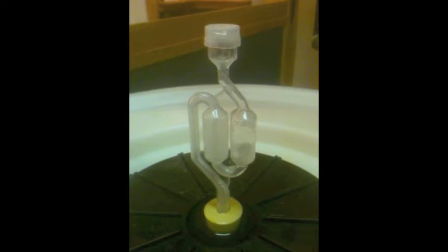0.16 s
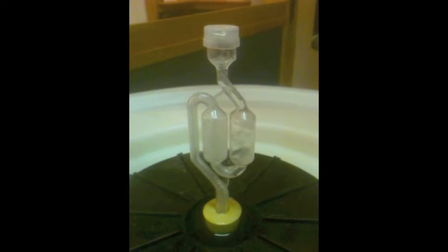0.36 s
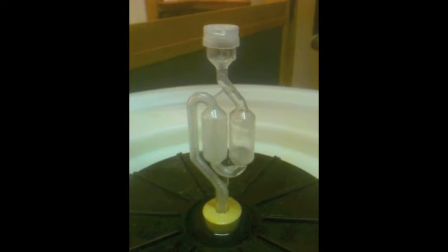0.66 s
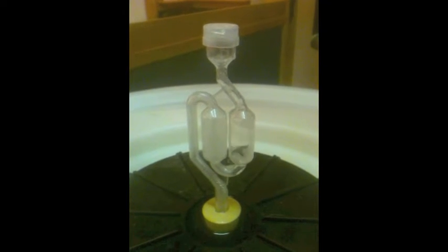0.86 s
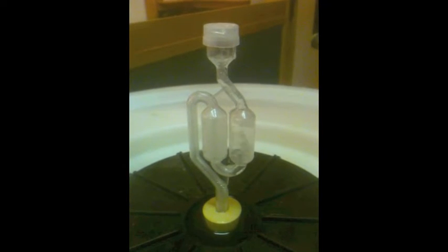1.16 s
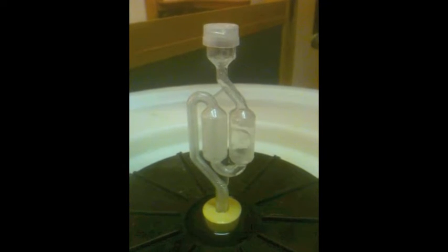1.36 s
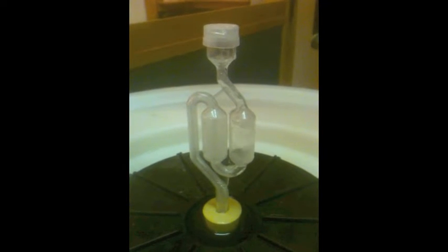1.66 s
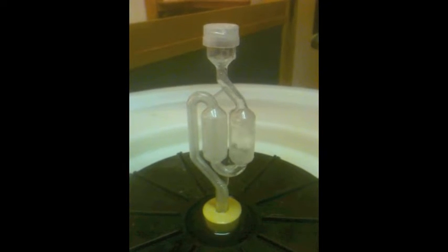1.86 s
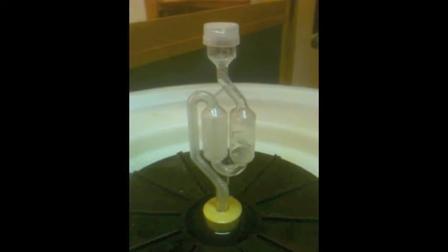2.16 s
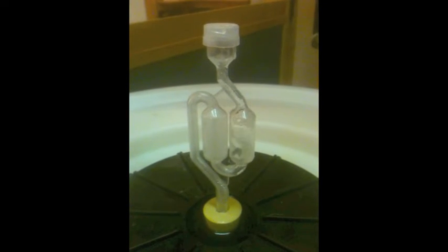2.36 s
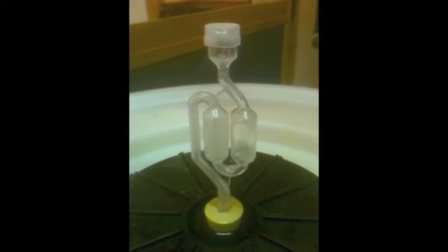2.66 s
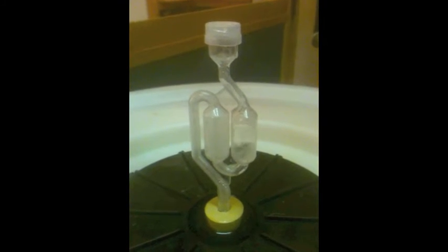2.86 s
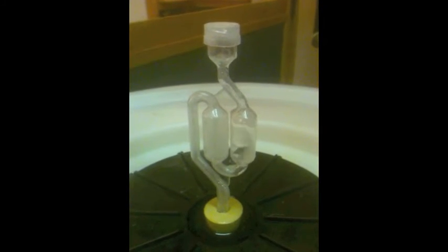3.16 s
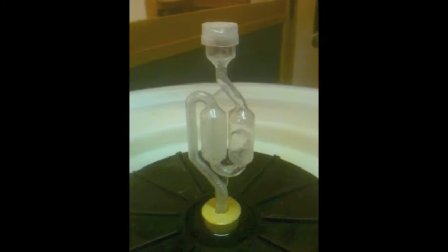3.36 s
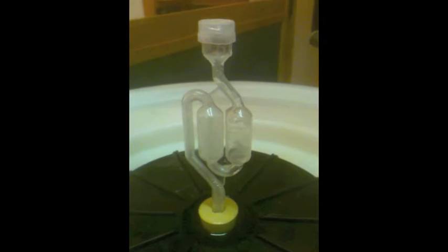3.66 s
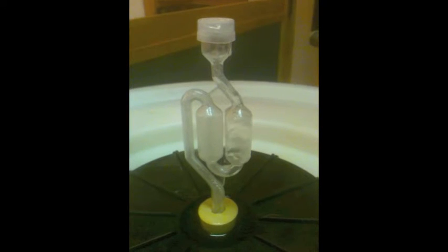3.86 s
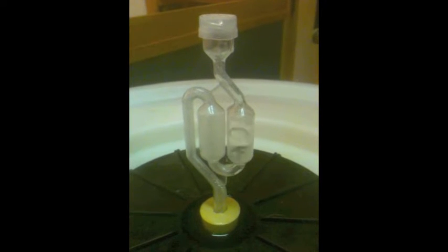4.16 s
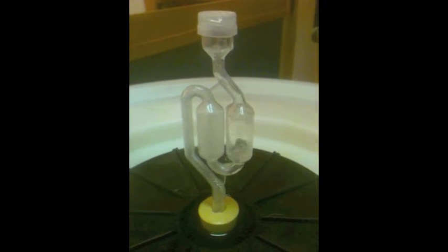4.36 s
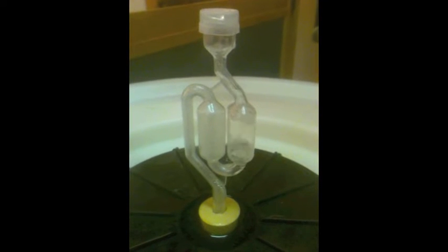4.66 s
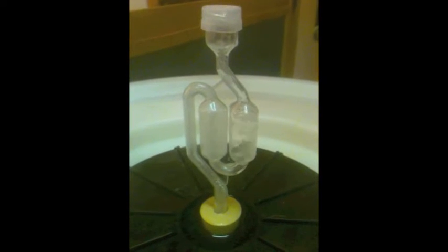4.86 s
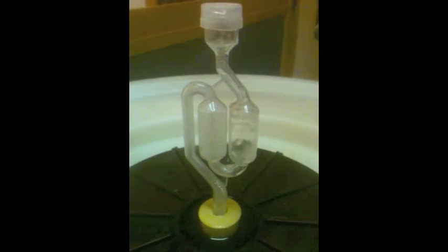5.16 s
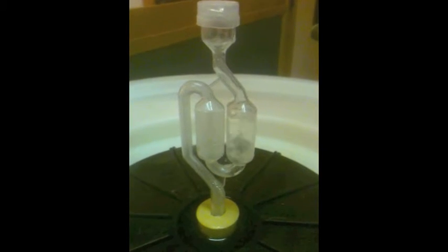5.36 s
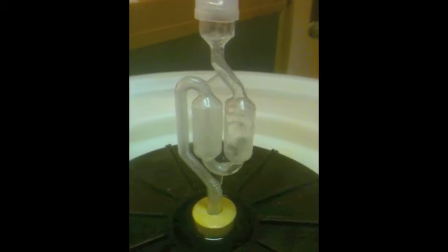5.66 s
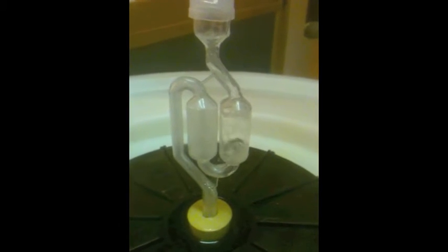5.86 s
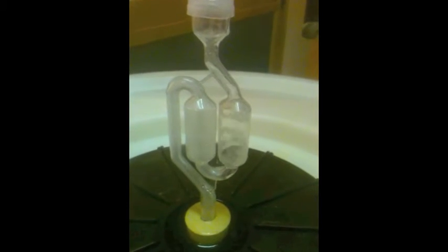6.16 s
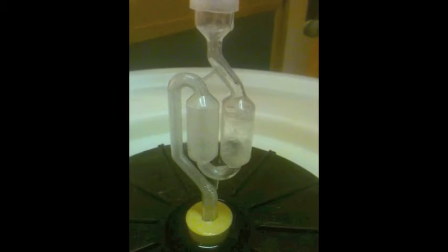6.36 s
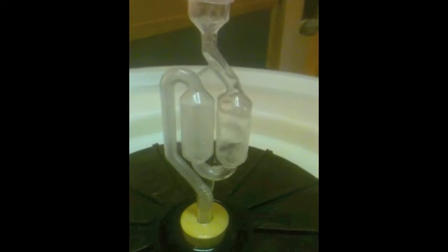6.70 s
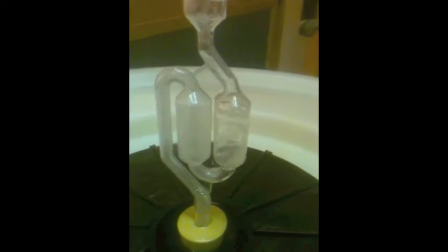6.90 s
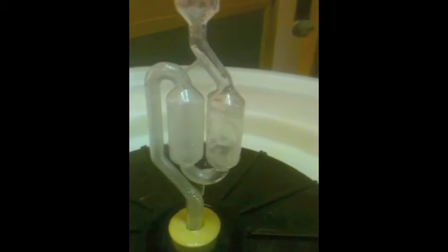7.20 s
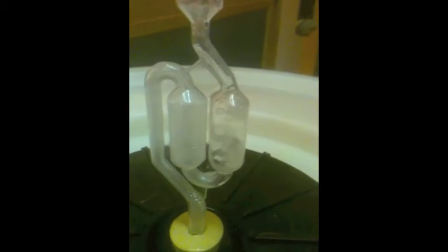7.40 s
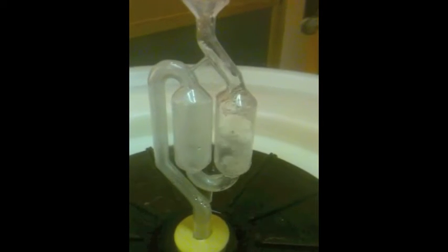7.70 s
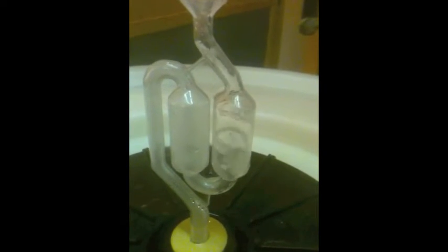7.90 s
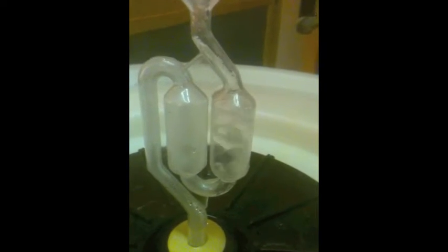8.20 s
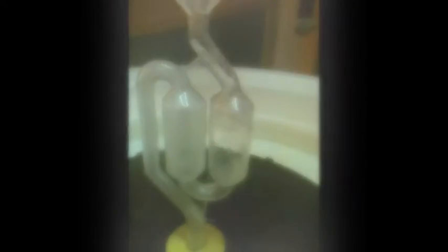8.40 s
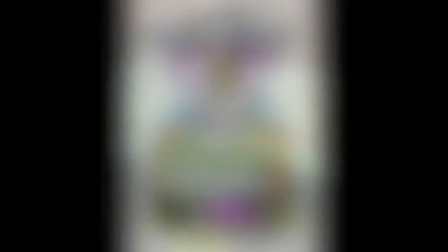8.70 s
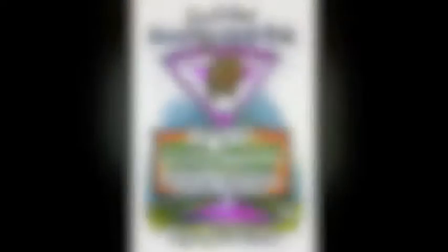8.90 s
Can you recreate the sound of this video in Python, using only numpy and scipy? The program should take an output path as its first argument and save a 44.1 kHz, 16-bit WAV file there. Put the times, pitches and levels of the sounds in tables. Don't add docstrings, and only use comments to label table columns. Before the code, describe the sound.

Rapid hollow glugs bubble nonstop through a small plastic airlock, each rising in pitch, with bright pops, ticks and wet snaps, fading out at the end.

```python
import sys
import numpy as np
from scipy import signal
from scipy.fft import rfft, irfft, next_fast_len
from scipy.io import wavfile
from scipy.ndimage import uniform_filter1d

SR = 44100
rng = np.random.default_rng(int(sys.argv[2]) if len(sys.argv) > 2 else 0)


def gain_from_db(level_db):
    decades = np.asarray(level_db, float) / 20
    return 10 ** decades


def inscribe(sig):
    pcm = np.round(np.clip(np.atleast_2d(sig).T, -1, 1) * 32767)
    wavfile.write(sys.argv[1], SR, pcm.astype(np.int16))


N = 398663

# [t/s, level/dB]
FADE = [
    (5.2, -8.5),
    (6.25, -9.5),
    (6.75, -10),
    (7.25, -16),
    (7.75, -19),
    (8.05, -29.5),
    (8.178, -43.5),
    (8.19, -105),
]
# [t/s, start f/Hz, rise/octaves over the life, level/dB]
DEEP_GLUGS = [(4.54, 256.4, 1.6, -27), (.165, 316, 0.52, -20), (.236, 445, 1.06, -22.5),
              (.629, 330, 1.68, -19.5), (.709, 272.5, 1.7, -24.5), (.776, 337, 0.25, -24),
              (1.158, 316.3, 0.79, -25), (1.609, 326.5, 1.21, -24.5), (1.69, 313.6, 0.42, -25),
              (1.956, 305.4, 0.43, -24), (2.006, 321.5, 2.1, -21.5), (2.601, 269, 1.26, -24),
              (7.815, 306.5, 0.65, -30), (8.088, 290, 1.2, -27), (2.803, 362, 0.49, -22.5),
              (2.919, 304, 0.7, -27), (3.435, 286.2, 1.92, -17), (3.864, 295.5, 0.95, -17.5),
              (4.053, 305.6, 2.45, -16.5), (4.074, 796, 0.48, -44), (4.453, 378, 2.16, -25),
              (4.644, 329, 1.02, -21), (5.03, 312, 0.55, -21.5), (5.426, 383.6, 1.3, -24.5),
              (6.073, 336, 0.51, -28.5), (6.498, 318.5, 1.16, -27.5), (.066, 294, 1.14, -25),
              (7.852, 351, 2.05, -30)]
# [t/s, start f/Hz, rise/octaves, level/dB]
LOW_GLUGS = [(1.352, 381, 1.03, -24), (6.01, 334, 0.75, -38), (.115, 274.6, 1.28, -24.5),
             (.443, 334, 1.05, -21.5), (.525, 310, 0.77, -24), (1.002, 334, 0.28, -24.5),
             (1.031, 313.6, 0.95, -19), (1.115, 290, 0.77, -17.5), (1.316, 317, 1.64, -17.5),
             (1.486, 303, 0.84, -17), (1.746, 318, 1.48, -16), (1.821, 293.4, 1.55, -17),
             (2.095, 338, 0.079, -22.5), (2.161, 293, 1.52, -17.5), (2.231, 315, 0.84, -19),
             (2.381, 316, 1.3, -17), (3.232, 308, 0.79, -16), (3.784, 377, 0.76, -16.5),
             (4.224, 387.5, 0.77, -17.5), (4.345, 352.5, 1.04, -18.5), (4.756, 279, 0.65, -17),
             (4.952, 415, 1.13, -21), (4.986, 380, 0.036, -21), (5.067, 263, 1.56, -14.5),
             (5.172, 311, 0.54, -21), (6.094, 318.4, 0.96, -19.5), (6.19, 365.4, 0.85, -23.5),
             (2.745, 325, 0.46, -28.5), (7.74, 398, 0.76, -29), (7.491, 308, 0.45, -26),
             (7.567, 364, 1.1, -22), (3.726, 257, 1.63, -22), (3.694, 318, .1, -35),
             (6.61, 370, 0.52, -30.5), (6.69, 338, 0.6, -31), (6.735, 328, 0.47, -35),
             (6.241, 337, 0.37, -32.5), (7.0, 327, 0.3, -32), (1.215, 352, 1.16, -24)]
# [t/s, start f/Hz, rise/octaves, level/dB]
MID_GLUGS = [(4.398, 317, 0.59, -24.5), (4.59, 335, .4, -25), (0.335, 306, 0.37, -21),
             (0.383, 431, 0.48, -21), (.483, 287, 0.64, -19.5), (.92, 341, 0.72, -20.5),
             (1.401, 309, 0.94, -16), (2.44, 311, 0.39, -19.5), (2.501, 445, 1.05, -14.5),
             (2.963, 384, 1.2, -14.5), (3.024, 314, 0.38, -19.5), (3.131, 338, 0.68, -23),
             (3.472, 313.5, 1.34, -16), (3.987, 349, 1.12, -20.5), (4.137, 391, 1.03, -19.5),
             (4.484, 390.5, 2.3, -23.5), (4.672, 478, 2, -19.5), (4.893, 283, 0.41, -21),
             (5.229, 418, 0.25, -15), (5.349, 284, 0.77, -20), (5.494, 372, 1.08, -21),
             (5.567, 329, 0.086, -15), (5.655, 277, 0.83, -21.5), (5.997, 391, 1.02, -23),
             (6.364, 289, 0.85, -23.5), (6.528, 374, 0.45, -20.5), (6.776, 313, 0.6, -23),
             (8.005, 384, 1.4, -19.5), (7.394, 342, 0.97, -23.5), (7.57, 807, 0.67, -24),
             (7.681, 314, 0.68, -25.5), (2.655, 328, 0.71, -23)]
# [t/s, start f/Hz, rise/octaves, level/dB]
HIGH_GLUGS = [(.77, 431, 0.71, -21.5), (1.874, 504, 1.1, -19), (1.924, 320, 0.19, -26),
              (2.08, 300, 0.55, -22.5), (2.705, 525, 0.5, -11), (2.856, 560, 0.69, -18.5),
              (2.978, 586, 0.16, -25), (3.056, 580, 0.81, -24.5), (3.309, 364, 0.63, -15),
              (3.561, 297, 0.3, -18.5), (3.629, 383, 0.85, -17.5), (4.278, 444, .02, -21),
              (4.505, 720, 0.15, -17), (4.818, 384, 0.83, -15.5), (5.147, 412, 0.031, -12),
              (5.82, 334, 0.19, -25.5), (5.862, 398, 1.17, -23.5), (6.291, 500, 0.47, -25),
              (6.435, 379, 0.55, -24.5), (6.925, 304, 0.2, -21.5), (7.163, 500, 0.89, -15.5),
              (7.268, 433, 0.78, -22), (7.334, 380, 1.3, -24.5), (7.927, 750, .23, -23),
              (7.931, 432, 1.07, -20), (2.575, 346, 0.17, -27), (7.22, 384, 0.078, -21.5)]
# [t/s, start f/Hz, rise/octaves, level/dB]
PLOPS = [(2.485, 595, .3, -37), (0.0, 258, .01, -10), (0.0, 626, 0.48, -7), (.565, 550, 0.54, -10.5),
         (.584, 717, 0.16, -25), (.86, 382, 0.89, -9), (1.189, 790, 0.39, -20.5), (1.553, 337, 0.24, -21),
         (1.576, 545, 0.87, -21), (1.668, 570, 0.43, -18.5), (1.761, 560, 0.49, -12.5),
         (2.308, 810, 0.19, -20.5), (3.232, 857, .01, -24), (3.943, 538, 0.27, -24.5),
         (4.078, 488, 0.87, -15.5), (4.245, 597, 0.084, -18.5), (4.543, 537, 0.41, -13.5),
         (5.736, 308, 0.62, -16), (5.946, 310, 0.18, -21), (6.844, 433, 0.47, -17), (6.923, 790, 0.11, -20),
         (6.998, 510, 0.33, -27.5), (7.144, 415, 0.4, -23), (8.03, 640, 0.5, -18)]
# [t/s, start f/Hz, rise/octaves, level/dB]
BRANCHES = [(2.363, 1190, 0.61, -18), (.868, 1103, 0.18, -19.5), (5.935, 1834, 2.3, -24),
            (1.67, 933, 0.72, -21.5), (2.006, 1386, 0.13, -24.5), (2.585, 750, 0.079, -21.5),
            (2.655, 823, 0.6, -18.5), (2.745, 586, 0.25, -24), (2.92, 697, 0.25, -30),
            (3.031, 796, 0.72, -21), (4.36, 1040, 0.6, -36.5), (4.506, 1158, 0.33, -17),
            (5.129, 1290, 0.77, -30), (5.248, 1057, 0.44, -22.5), (5.295, 696, 0.36, -25.5),
            (5.33, 292, .1, -24), (5.50, 400, 1.1, -26), (5.585, 472, 0.69, -18), (5.44, 1900, 0.155, -31)]
# [t/s, peak level/dB, f/Hz]
DROPS = [(0.08, -24.5, 3500), (0.1258, -30, 2120), (0.2957, -25.5, 1910), (0.3421, -25, 1470),
         (0.4668, -29, 2240), (1.3153, -24.5, 2110), (1.3389, -26, 1980), (1.3495, -25, 2440),
         (1.6834, -21, 2130), (1.7659, -19.5, 2200), (1.915, -25, 2300), (2.0073, -20.5, 1480),
         (2.154, -24, 3160), (2.2343, -36, 3900), (2.5323, -21.5, 3880), (2.5616, -31, 1740),
         (2.792, -21.5, 1370), (2.8612, -34, 3630), (3.182, -19.5, 4000), (3.299, -20.5, 3080),
         (3.551, -24.5, 2420), (3.6948, -23, 4230), (3.749, -25, 1790), (3.9489, -25.5, 2180),
         (4.301, -20.5, 2280), (4.3403, -18, 1410), (4.4643, -21.5, 1870), (4.7153, -22, 2200),
         (4.7917, -27, 1790), (4.817, -25, 1610), (4.9445, -24, 2840), (5.1146, -26.5, 2210),
         (5.1264, -18, 4420), (5.249, -24, 1610), (5.31, -24, 2350), (5.3455, -23.5, 1640),
         (5.4395, -22.5, 1950), (5.6342, -31, 1470), (5.657, -28, 2150), (5.932, -22.5, 1870),
         (6.232, -29, 3580), (6.2962, -24.5, 4200), (6.8568, -31, 2300), (6.868, -21, 3900)]


def in_time(rows):
    return np.interp(np.arange(N) / SR, *np.transpose(rows))


def at_hz(points, hz):
    points = np.array(points)
    return np.interp(np.log(hz), np.log(points[:, 0]), points[:, 1])


def rms_one(x):
    return x / np.sqrt(np.mean(x ** 2))


def lowpass(x, hz):
    return signal.sosfilt(signal.butter(2, hz, fs=SR, output="sos"), x)


def bandpass(x, low_hz, high_hz, order=2):
    return signal.sosfilt(signal.butter(order, [low_hz, high_hz], "band", fs=SR, output="sos"), x)


def add(out, s, sound):
    i = int(s * SR)
    out[i:i + len(sound)] += sound[:N - i]


def before_fade(events):
    return [(s, db - np.interp(s, *np.transpose(FADE)), *rest) for s, db, *rest in events]


def clicks_at(events):
    clicks = np.zeros(N)
    for s, db, *_ in events:
        clicks[int(s * SR)] = gain_from_db(db)
    return clicks


def ring(clicks, hz, t60):
    radius, w = gain_from_db(-60 / (t60 * SR)), 2 * np.pi * hz / SR
    return signal.lfilter([0, np.sin(w)], [1, -2 * radius * np.cos(w), radius ** 2], clicks + 1e-18)


def puff(clicks, noise):
    return signal.lfilter([1], [1, -.94], clicks) * noise


def bubble(hz, rise, db, life_ms, shape, sign, overtone=0, swell=.55):
    t = np.arange(int(life_ms * SR / 1000 * 7 ** (1 / shape)) + 9) / SR
    age = 1000 * t / life_ms
    pitch = np.minimum(hz * 2 ** np.minimum(rise * age ** 1.2, 3), .45 * SR)
    attack = 1 - np.exp(-t * hz / swell)
    decay = np.exp(-age ** shape)
    phase = 2 * np.pi * np.cumsum(pitch) / SR
    return sign * gain_from_db(db) * attack * decay * (np.sin(phase) + overtone * np.sin(2 * phase))


def room():
    # [f/Hz, level/dB per Hz]
    hiss_curve = [
        (100, -46),
        (200, -16),
        (350, -8),
        (810, -11),
        (1300, -19),
        (4400, -15.5),
        (5400, -29),
        (13500, -29),
        (16000, -34),
    ]
    hz = np.fft.rfftfreq(N, 1 / SR) + 1
    white = rng.standard_normal((3, N))
    hiss = rms_one(irfft(rfft(white[0]) * gain_from_db(at_hz(hiss_curve, hz)), N))
    hum = rms_one(ring(white[1], hz=60, t60=0.6))
    whine = rms_one(ring(white[2], hz=12960, t60=.8))
    return gain_from_db(-25 - 15.5) * hiss + gain_from_db(-52) * hum + gain_from_db(-67) * whine


def hand():
    # [t/s, level/dB]
    rumble = [
        (0, -18),
        (.15, -32),
        (3.5, -34),
        (3.8, -30.5),
        (4.5, -34),
        (4.7, -28),
        (5.6, -25.5),
        (5.9, -37),
    ]
    # [t/s, peak level/dB]
    shifts = [
        (4.688, -20.5),
        (4.981, -22),
        (5.067, -23),
        (5.388, -30.5),
        (5.64, -23.5),
        (6.273, -30),
        (7.382, -35.5),
        (7.647, -39),
        (7.92, -40.5),
    ]
    deep = bandpass(rng.standard_normal(N), 8, 66, order=3)
    bumps = clicks_at(before_fade(shifts))
    thuds = ring(bumps, 107, 0.044) + 1.3 * ring(bumps, 227, 0.041)
    return gain_from_db(in_time(rumble)) * rms_one(deep) + lowpass(thuds, 400)


def glugs():
    tone, knock = np.zeros(N), np.zeros(N)
    faint = rng.uniform([0, 280, .3, -40, 15], [8.2, 620, 1.1, -32, 50], (210, 5))
    kinds = [(DEEP_GLUGS, 94), (LOW_GLUGS, 50), (MID_GLUGS, 43), (HIGH_GLUGS, 26), (PLOPS, 18)]
    rows = [(*row, life_ms) for table, life_ms in kinds for row in table] + faint.tolist()
    draws = rng.uniform(-1.2, 1, (len(rows), 2))
    for (s, hz, rise, db, life_ms), (push, squeeze) in zip(rows, draws):
        sign = np.sign(push)
        add(tone, s, bubble(hz, rise, db, life_ms, 3, sign, overtone=.16 * squeeze))
        knock[int(s * SR)] += gain_from_db(db + 10.0) * push
    slosh = rms_one(lowpass(rng.standard_normal(N), 90))
    return tone * gain_from_db(3.2 * slosh), knock


def through_neck(tone, knock):
    tone, knock = bandpass([tone, knock], 150, 1100, order=3)
    at_neck = signal.lfilter(*signal.iirpeak(560, 2, fs=SR), tone)
    return tone + (gain_from_db(4) - 1) * at_neck, knock


def chamber(blows):
    # [f/Hz, level/dB, t60/s]
    modes = [
        (245, -13, .04),
        (350, -14, .09),
        (820, -4.5, .07),
        (1165, -10, .025),
    ]
    return sum(gain_from_db(db) * ring(blows, hz, t60) for hz, db, t60 in modes)


def walls(x, level_db):
    out = np.zeros(N)
    lags = (np.cumsum(rng.uniform(0.0028, 0.013, size=14)) * SR).astype(int)
    for k, lag in enumerate(lags):
        out[lag:] += (-1) ** k * gain_from_db(level_db - 420 * lag / SR) * x[:-lag]
    return lowpass(out, 2500)


def churn(big):
    loudness = np.abs(signal.hilbert(big, next_fast_len(N))[:N])
    return gain_from_db(-18.0) * loudness * bandpass(rng.standard_normal(N), 700, 3000)


def spray(count, spread_db, cycles):
    # [f/Hz, level/dB]
    colour = [
        (700, -55.5),
        (1200, -24),
        (4200, -24),
        (6300, -32.5),
        (8600, -24),
        (14000, -60.5),
    ]
    out = np.zeros(N)
    swarms = np.repeat(rng.random((count // 3, 2)), 3, axis=0)
    big_ones = DEEP_GLUGS + LOW_GLUGS + MID_GLUGS + HIGH_GLUGS + PLOPS + BRANCHES
    born = np.array([row[0] for row in big_ones])
    wake = rng.choice(born, count // 3) + rng.exponential(.055, count // 3)
    swarms[:, 0] = np.repeat(np.minimum(wake, 8.2), 3)
    for (when, size), draw in zip(swarms, rng.standard_normal((count, 5))):
        hz = min(700 * 20 ** size * 2 ** (.6 * draw[0]), 15500)
        life_ms = 1000 * cycles * 2 ** (.45 * draw[1]) / hz
        db = at_hz(colour, hz) + spread_db * draw[2]
        drop = bubble(hz, .01 * abs(draw[4]), db, life_ms, 1, np.sign(draw[4]), swell=1.2)
        add(out, abs(when + .0025 * draw[3]), drop)
    return out


def pops(rows, cycles, swell, boost_db):
    tone = np.zeros(N)
    for (s, hz, db), sign in zip(rows, rng.choice([-1, 1], len(rows))):
        life_ms = 1000 * cycles / hz
        add(tone, s, bubble(hz, .025, db + boost_db, life_ms, 1.2, sign, swell=swell))
    return tone


def small_bubbles():
    # [t/s, f/Hz, level/dB]
    pings = [(.01, 3560, -14), (0.182, 4260, -25.5), (.554, 4040, -16), (.648, 4240, -21.5),
             (1.685, 4630, -24), (2.251, 4040, -21), (2.611, 3867, -23.5), (2.631, 4180, -21.5),
             (2.882, 3510, -20), (3.09, 4230, -20), (3.984, 3760, -8.5), (3.988, 4300, -23),
             (4.963, 2910, -18.5), (5.567, 4540, -23.5), (5.58, 4230, -19.5), (6.133, 4480, -25),
             (6.192, 4000, -27), (6.37, 3830, -25.5), (6.605, 4100, -21)]
    # [t/s, f/Hz, level/dB]
    pockets = [(3.632, 1240, -21), (2.925, 1290, -22), (3.172, 1140, -23), (.57, 1207, -10.5),
               (1.525, 2400, -17), (1.542, 1150, -11.5), (1.765, 1050, -14), (2.366, 2480, -7.5),
               (3.392, 1270, -9.5), (3.478, 1670, -13), (3.765, 2100, -15), (4.117, 1216, -7),
               (4.25, 1240, -13.5), (4.264, 2450, -15.5), (4.268, 1320, -19), (4.403, 1202, -6.5),
               (4.525, 1175, -14), (6.453, 1280, -19.5), (6.881, 2270, -13.5), (6.901, 2440, -14),
               (7.125, 2300, -18.5), (7.158, 1420, -10), (7.589, 2250, -8), (7.879, 1500, -20),
               (8.022, 2520, -13.5)]
    # [t/s, f/Hz, level/dB]
    films = [(0.413, 4760, -20.5), (1.035, 1180, -16), (1.197, 1250, -17.5), (1.578, 1170, -13),
             (1.96, 2670, -18), (2.172, 3530, -13.5), (2.309, 1140, -11.5), (2.881, 2240, -15),
             (3.213, 2540, -19), (3.315, 2220, -18), (3.315, 4270, -10), (3.322, 1280, -13.5),
             (3.712, 5600, -17), (4.178, 2070, -16), (4.283, 3560, -17), (4.499, 1500, -15.5),
             (4.665, 1120, -19.5), (4.689, 1185, -14), (4.988, 3000, -20), (5.201, 1600, -16),
             (5.498, 3480, -12), (5.767, 1200, -18.5), (6.147, 4170, -16.5), (6.148, 2270, -18),
             (6.48, 4300, -17.5), (6.643, 4320, -21), (6.881, 4500, -11.5), (7.091, 3380, -20),
             (7.093, 1690, -20)]
    droplets = [(s, hz, db) for s, db, hz in before_fade(DROPS)]
    out = pops(pings, cycles=11.0, swell=0.5, boost_db=12.0)
    out += pops(pockets, cycles=7.1, swell=1.1, boost_db=6.5)
    out += pops(films, cycles=4.6, swell=0.066, boost_db=7.0)
    out += pops(droplets, cycles=6.3, swell=0.17, boost_db=0.0)
    return out


def snaps():
    # [t/s, peak level/dB]
    middling = [(0.175, -25), (0.2883, -22), (0.3514, -22), (0.408, -24), (0.7751, -34), (1.004, -36),
                (1.0218, -21), (1.079, -29), (1.1856, -23), (1.2615, -29), (1.6486, -34), (1.7647, -29),
                (1.86, -28), (1.8871, -26.5), (2.204, -35), (2.273, -42), (2.2852, -15), (2.3807, -27),
                (2.4284, -26), (2.7596, -34), (2.831, -34), (3.0274, -34), (3.0894, -23), (3.27, -34),
                (3.3164, -30), (3.4032, -23), (3.4035, -13.5), (3.5957, -26), (3.71, -18), (3.7705, -31),
                (3.9516, -28), (3.9828, -31), (4.0307, -31), (4.1323, -30), (4.2662, -27), (4.3, -25),
                (4.4303, -28), (4.552, -39), (4.7725, -27), (4.829, -33), (4.8545, -25), (4.8838, -26),
                (5.1487, -33), (5.232, -27), (5.2664, -36), (5.2822, -24.5), (5.3837, -28), (5.3833, -37),
                (5.9284, -23), (6.369, -34), (6.401, -35), (6.482, -32), (6.6143, -28), (6.6418, -33),
                (6.8212, -26), (7.077, -27), (7.2053, -43), (7.348, -34), (7.59, -37), (7.629, -38)]
    # [t/s, peak level/dB]
    larger = [(0.4123, -33), (0.6496, -18.5), (1.3598, -21), (1.5993, -26), (1.6876, -31), (2.1021, -39),
              (2.2498, -42), (2.2842, -24), (2.6299, -33), (3.091, -22), (3.301, -40), (3.313, -31),
              (3.336, -21.5), (3.5536, -23), (3.7114, -25), (3.828, -28.5), (3.9489, -29), (3.9834, -32),
              (5.1242, -33), (5.384, -32), (5.4234, -25), (5.5657, -39), (5.5793, -27), (6.0745, -32),
              (6.133, -32), (6.2056, -24), (6.313, -30), (6.478, -31), (6.88, -36), (7.0, -31.5)]
    # [t/s, peak level/dB]
    finest = [(0.174, -37.5), (0.2867, -36), (0.3316, -42), (0.3466, -25), (0.4264, -30), (1.8876, -36),
              (2.1216, -36), (2.2837, -42), (2.9542, -33), (3.025, -29), (3.0889, -38), (3.3258, -35),
              (3.4032, -25), (3.6292, -26), (3.7105, -29), (4.0442, -30), (4.4348, -26), (4.8544, -40),
              (5.7079, -26), (5.8356, -33), (5.9314, -29), (6.1769, -30), (6.3719, -37), (6.4497, -36),
              (6.6134, -27), (6.8803, -41), (6.9461, -35), (7.3128, -39)]
    ring_hz = [
        8310,
        5600,
        12200,
    ]
    # [f/Hz, level/dB]
    cap = [
        (2300, 11.5),
        (4200, 2),
        (5800, -9),
        (8700, 9),
        (11800, 4),
    ]

    kinds = [before_fade(rows) for rows in (middling, larger, finest)]
    draws = rng.random((3, N))
    clear = clicks_at(sum(kinds, []))
    hits = gain_from_db(-6.0) * clear + gain_from_db(-18.5) * clicks_at(before_fade(DROPS))
    out = bandpass(puff(hits, rng.standard_normal(N)), 2000, 14500)
    for rows, hz in zip(kinds, ring_hz):
        sizes = hz * 2 ** rng.uniform(-.13, .13, len(rows))
        rings = [(s, size, db) for (s, db), size in zip(rows, sizes)]
        out += pops(rings, cycles=5.1, swell=0.67, boost_db=3.5)

    flurry = gain_from_db(4 * rms_one(lowpass(rng.standard_normal(N), 14)))
    crowding = uniform_filter1d((clear > 0) * 1., 500) * 500
    per_second = 130 * (.35 * flurry + 1.2 * crowding)
    faint = (draws[0] < per_second / SR) * gain_from_db(-33 - 18 * draws[1])
    colour = (draws[2] * len(cap)).astype(int)
    noise = rng.standard_normal(N)
    for k, (hz, db) in enumerate(cap):
        out += gain_from_db(db) * bandpass(puff(faint * (colour == k), noise), hz / 1.3, hz * 1.3)
    return out


def branches():
    # [t/s, f/Hz, rise/octaves, level/dB, life/ms]
    film = (1.541, 1500, .2, 0, 5)
    out = np.zeros(N)
    for s, hz, rise, db in BRANCHES:
        add(out, s, bubble(hz, rise, db, 30, 3, 1))
    add(out, film[0], bubble(*film[1:], 1.5, 1))
    return out


def scene():
    big, knock = through_neck(*glugs())
    small = small_bubbles() + gain_from_db(-1.0) * spray(count=7200, spread_db=4.5, cycles=3.4)
    small = small + branches() + churn(big)
    water = big + small
    airlock = water + chamber(knock + gain_from_db(-42.5) * water)
    mix = airlock + walls(airlock, level_db=-17.0) + snaps() + room() + hand()
    return mix[None]


def roll_off(x):
    return signal.sosfilt(signal.butter(12, 16440, fs=SR, output="sos"), x)


def record(dry):
    top_cut = signal.cheby2(16, 40, 16250, fs=SR, output="sos")
    mix = signal.sosfilt(top_cut, dry) * gain_from_db(in_time(FADE))
    return roll_off(mix)


dry = scene()
out = record(dry)
inscribe(out)
```